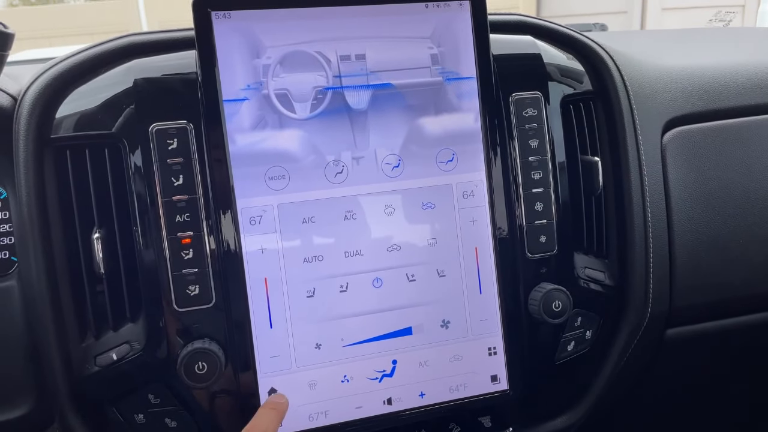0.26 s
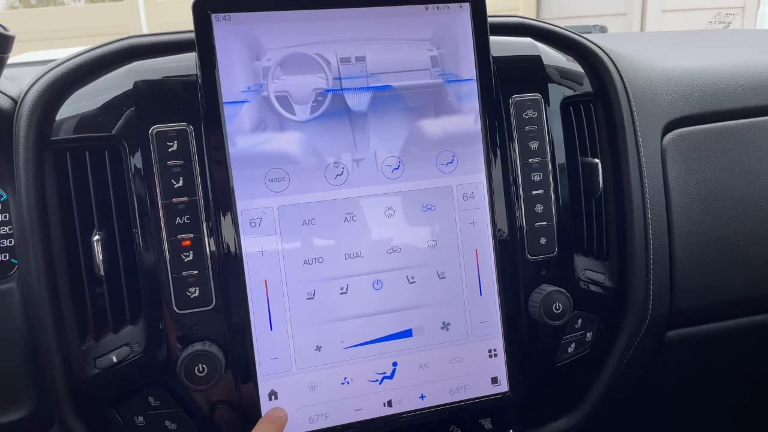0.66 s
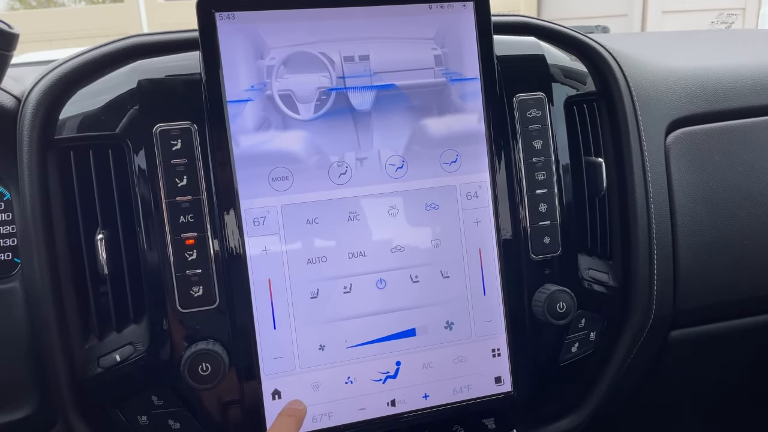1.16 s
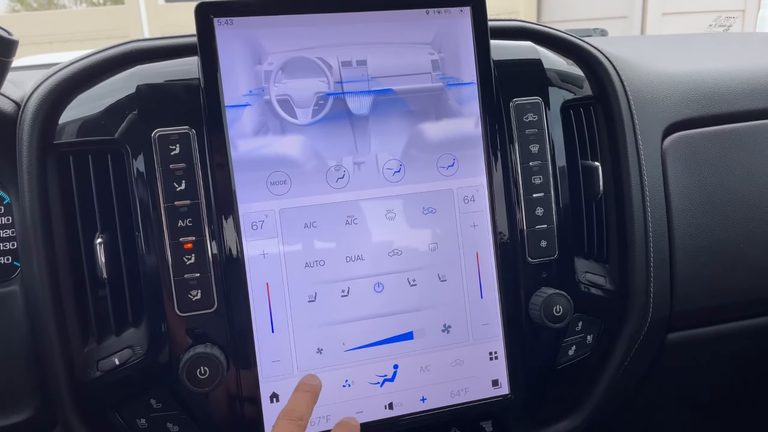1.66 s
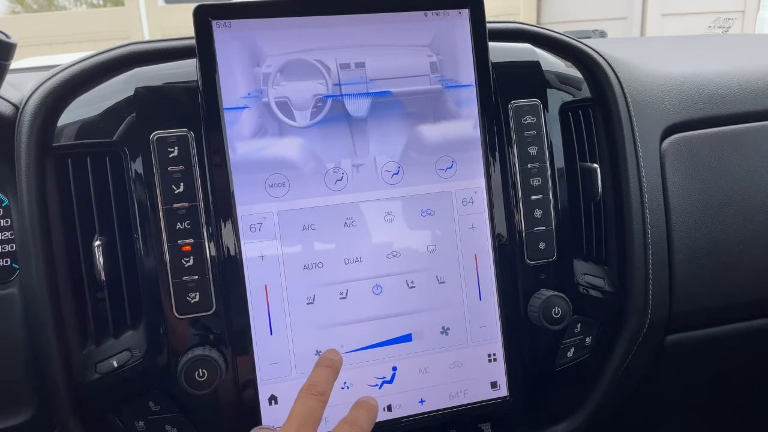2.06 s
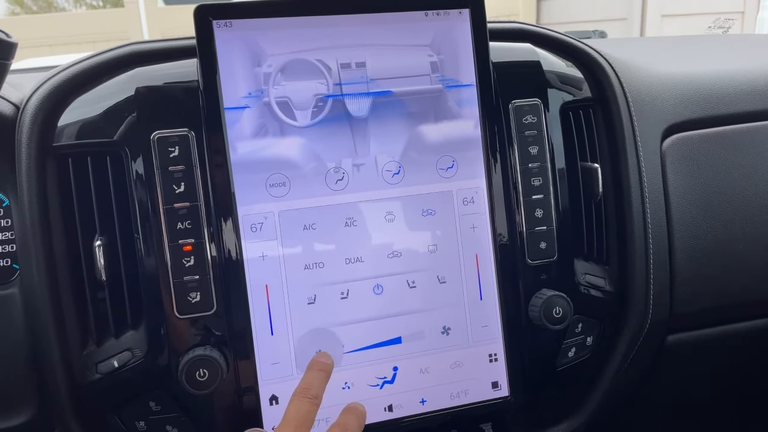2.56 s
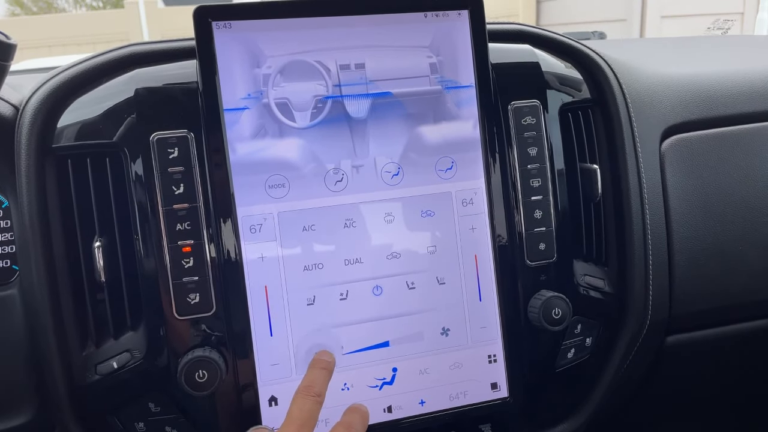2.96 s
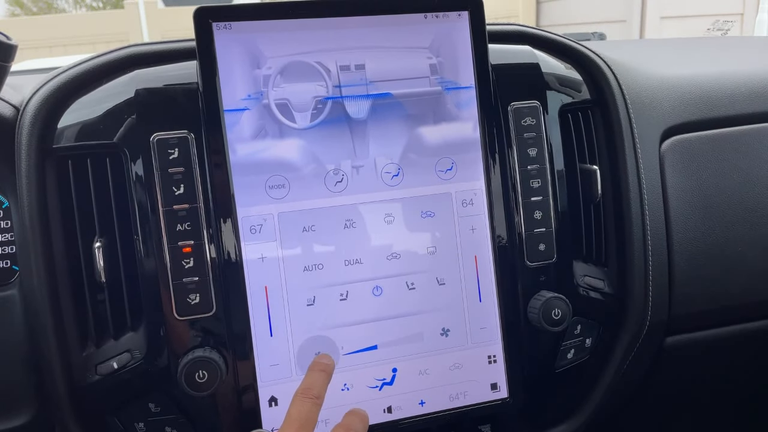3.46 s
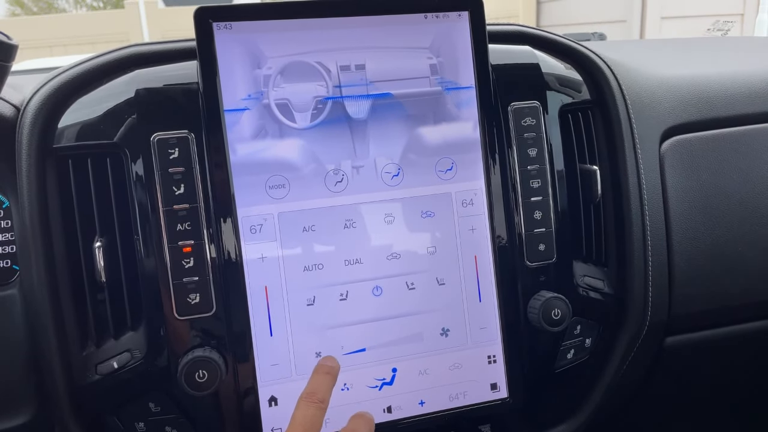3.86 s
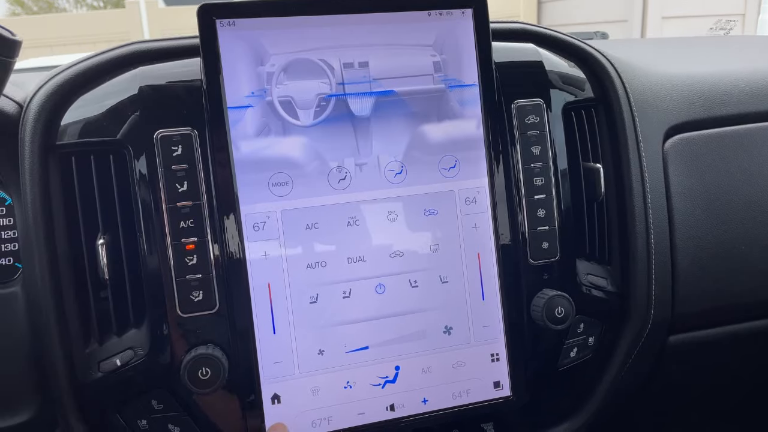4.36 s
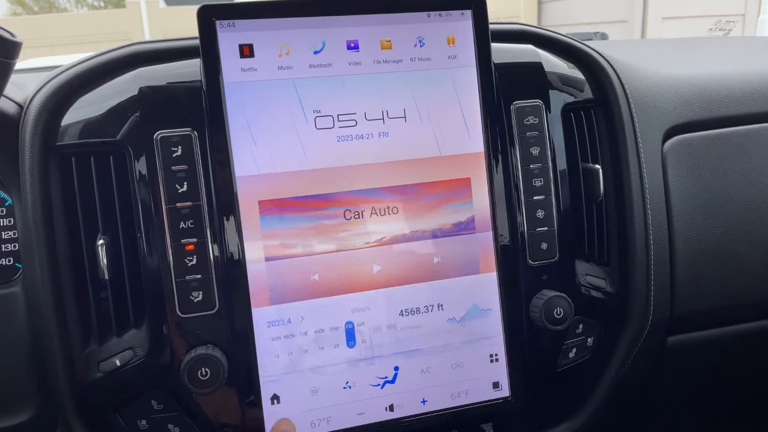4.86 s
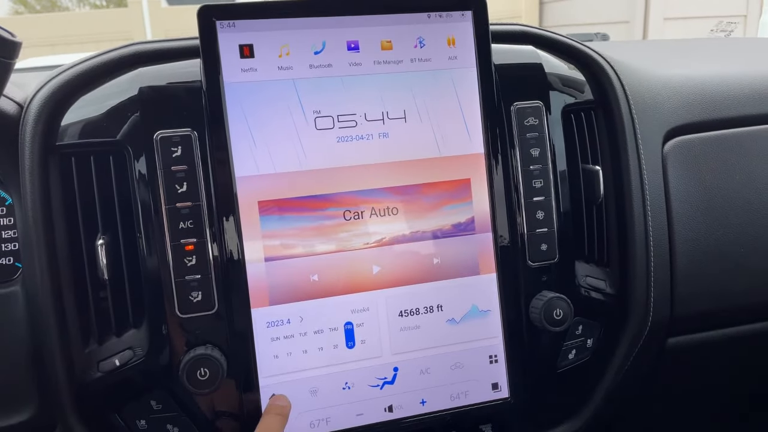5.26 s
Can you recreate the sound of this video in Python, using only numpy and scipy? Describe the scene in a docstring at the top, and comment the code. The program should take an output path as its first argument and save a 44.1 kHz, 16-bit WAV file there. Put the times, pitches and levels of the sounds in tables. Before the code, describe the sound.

Inside a closed pickup cab, heard near the dashboard, an idling engine gives a deep, steady hum beneath a low, slightly uneven rumble. From the start, the climate fan blows air through the vents, a soft rush with a hollow duct tone and a faint whine. The fan gradually speeds up until about 3.3 seconds, the air growing louder and hissier as the whine rises in pitch. Between about 2.4 and 4.3 seconds, a few slight, brief swells flicker in the airy noise. The fan holds its top speed until about 3.8 seconds, then slows, so the rush softens and the whine sinks. At about 5 seconds, a finger on the touch screen makes a quick cluster of soft, bright ticks with a faint brush. The air and engine continue to the end at about 5.5 seconds, fairly quiet throughout.

```python
"""Inside the cab of an idling pickup, the climate blower winds up and then slows again.
Its speed drives the rush of the vents, the hollow ring of the ducts and a faint blade whine;
near full speed the airy noise has a few brief swells. Underneath sit the boom of the cab and the
engine's firing hum. Near the end a few soft ticks sound by the touch screen."""
import sys
import numpy as np
from scipy.fft import rfft, irfft, next_fast_len
from scipy.io import wavfile
from scipy.ndimage import uniform_filter1d, map_coordinates

SR = 44100
rng = np.random.default_rng(int(sys.argv[2]) if len(sys.argv) > 2 else 0)


def wav_out(sig):
    """Save sig, one row per channel (or a flat mono array), as 16-bit PCM at SR to the path in sys.argv[1]."""
    wavfile.write(sys.argv[1], SR, np.round(np.clip(np.atleast_2d(sig).T, -1, 1) * 32767).astype(np.int16))


N = 243167
TIME = np.arange(N) / SR
SIDES = np.array([[.5], [-.5]])  # splits a left-minus-right offset between the channels


def amp(db):
    """Decibels to gain."""
    return 10 ** (np.asarray(db) / 20)

def pan(left_db):
    """Stereo gains with the left side left_db above the right."""
    return amp(left_db * SIDES)

def unit(x):
    """Scale to rms 1."""
    return x / np.sqrt(np.mean(x ** 2) + 1e-30)

def along(points, hz):
    """Read a curve of (f/Hz, value) points on a log frequency axis."""
    f, values = np.transpose(points)
    return np.interp(np.log(hz + 1), np.log(f), values)

def wobble(rate):
    """A smooth random curve, rate knots a second."""
    knots = rng.standard_normal(int(N * rate / SR) + 4)
    return map_coordinates(knots, [np.arange(N) * rate / SR])

def bump(at, half_s):
    """A bell-shaped swell of height 1, centred on time at."""
    return np.exp(-.5 * ((TIME - at) / half_s) ** 2)

def tone(hz, drift, rate):
    """A sine of rms 1 whose phase wanders by about drift radians."""
    return unit(np.sin(2 * np.pi * (hz * TIME + rng.random()) + drift * wobble(rate)))

def filtered(x, response):
    """Pass x through a complex frequency response."""
    size = next_fast_len(N + 8192, real=True)
    return irfft(rfft(x, size) * response(np.fft.rfftfreq(size, 1 / SR)), size)[..., :N]

def resonance(f, hz, width):
    """A band-pass around hz, applied twice for steep skirts."""
    return (1j * f * width / (hz ** 2 - f ** 2 + 1j * f * width)) ** 2

def stereo_noise(spectrum, likeness, balance):
    """Coloured noise of rms 1, its stereo width and balance set by frequency."""
    def mid_side(f):
        angle = np.arccos(np.clip(along(likeness, f), -.999, .999)) / 2
        return amp(along(spectrum, f)) * [np.cos(angle), np.sin(angle)]
    mid, side = filtered(rng.standard_normal((2, N)), mid_side)
    return unit(filtered(np.array([mid + side, mid - side]), lambda f: pan(along(balance, f))))


# The blower's rise and fall: t/s, blade rate f/Hz, whine level/dB
BLOWER_RAMP = [(0, 420.4, -74), (.5, 448, -69), (1, 473.4, -68), (1.5, 496.4, -65), (2, 516, -57.5),
               (2.25, 526.5, -63), (2.65, 541, -58.5), (3.001, 550.4, -64), (3.3, 555, -73),
               (3.8, 555, -59), (4.02, 549.4, -66.5), (4.2, 545.3, -56.5), (4.6, 527.6, -60.5),
               (4.9, 511.6, -61), (5.51, 487, -71.5)]

def blower(ease_s=0.22):
    """Blade rate and whine level over time; the wheel's inertia rounds off each change of speed."""
    times, *columns = np.transpose(BLOWER_RAMP)
    curves = [np.interp(TIME, times, column) for column in columns]
    return [uniform_filter1d(curve, int(ease_s * SR), mode="nearest") for curve in curves]

# Colour of the air's body and of its bright top: f/Hz, relative level/dB
RUSH_EQ = [(60, -9), (120, -3.5), (150, -2.5), (200, 1.5), (270, -2.5), (350, -6), (520, -6.5),
           (610, -12.5), (1000, -15.5), (1850, -23), (2300, -23), (2550, -28), (3700, -33.5), (6000, -68.5),
           (14000, -90)]
HISS_EQ = [(1500, -25), (3000, -6.5), (4200, 0.5), (4800, 2), (5800, -5), (7000, -7), (8800, -10.5),
           (9200, -13), (13000, -19.5), (14300, -32), (14900, -54.5)]
# Stereo image of the air: f/Hz, left-right likeness (clipped to -1..1)
AIR_LIKENESS = [(100, -3.5), (170, 1.2), (260, 0.86), (380, 0.75), (500, 0.57), (620, -0.24), (1000, -0.09),
                (1300, 0), (1850, -0.2), (2400, .5), (3200, 0.2), (4700, .5), (7000, -0.18), (9000, 0.6)]
# Its balance: f/Hz, left over right/dB
AIR_BALANCE = [(100, -0.5), (300, 4.5), (520, 3), (750, 2), (1200, 1), (1700, -0.5), (2500, -2.5),
               (3200, 1.5), (4400, 2.5), (8000, 0)]
# Its phase offset: f/Hz, left lead/rad
AIR_LEAD = [(2300, 0.022), (2800, 0.52), (3800, 0.36), (5000, 0.0014), (9000, 0.032)]

def vents(speed):
    """Air rushes through the louvres; the hiss grows faster with speed than the body does."""
    flutter = amp(0.29 * wobble(7.1))
    rush = amp(-44.5) * speed ** 2.7 * stereo_noise(RUSH_EQ, AIR_LIKENESS, AIR_BALANCE)
    hiss_gain = amp(-72.5 + 0.97 * wobble(13)) * speed ** 6
    hiss = hiss_gain * stereo_noise(HISS_EQ, AIR_LIKENESS, AIR_BALANCE)
    return flutter * filtered(rush + hiss, lambda f: np.exp(1j * SIDES * along(AIR_LEAD, f)))

# Hollow modes of cab, ducts and vents: f/Hz, nominal width/Hz, level at full speed/dB, left lead/rad
DUCT_MODES = [(159, 47, -57.5, 2.5), (180, 19, -57, 0.95), (260.3, 22, -58, -0.5), (642.3, 15, -67.5, -0.5),
              (682.4, 16, -74.5, 0.5), (758, 28, -67, -0.5), (814, 45, -68, 2), (931, 55, -65.5, 0.9),
              (1060, 44, -73.5, 2.5), (1303, 22, -70.5, 1.5), (1405, 290, -62, -2.5), (1540, 75, -68, -1.7),
              (1611, 46, -66, 1.5), (1741, 29, -65.5, 1), (1893, 36, -71.5, 1), (1980, 50, -66, 0.5),
              (2051, 34, -67, -.9), (2115, 42, -64, -1.2), (2332, 99, -70.5, -0.7), (2650, 62, -75.5, 3.5),
              (2767, 29, -77, -0.5), (2927, 51, -77.5, -1.5), (3160, 94, -79, 0.5), (3584, 140, -78.5, 1),
              (3610, 51, -79.5, 1), (3786, 55, -78.5, -1.5), (4330, 61, -91.5, 0.9), (4600, 70, -88.5, 0.5),
              (4740, 50, -89.5, 0.5), (4884, 55, -82, 0.8)]

def ducts(speed):
    """Turbulence rings the duct and cab resonances, which hold their pitch as the speed changes."""
    ring = np.zeros((2, N))
    for hz, width, db, lead in DUCT_MODES:
        stereo_phase = np.exp(1j * lead * SIDES)
        pass_width = 1.3 * width  # the double pass narrows the band again
        band = filtered(rng.standard_normal(N), lambda f: stereo_phase * resonance(f, hz, pass_width))
        drive = speed ** (4.87 * (hz / 2000) ** 0.49)  # faster air feeds the high modes most
        ring += amp(db + wobble(11)) * unit(band) * drive
    flutter = amp(0.4 * wobble(8.1))
    return ring * flutter

def blades(blade_hz, whine_db, rough_share=0.33):
    """The blade whine glides with the wheel; turbulence smears a share of its power."""
    phase = 2 * np.pi * np.cumsum(blade_hz) / SR + 0.5 * wobble(12)
    smear_rate = 44.95  # knots a second
    smeared = unit(wobble(smear_rate) * np.sin(phase) + wobble(smear_rate) * np.cos(phase))
    whine = np.sqrt(1 - rough_share) * unit(np.sin(phase)) + np.sqrt(rough_share) * smeared
    return amp(whine_db + 1.2 * wobble(14)) * whine * pan(4)

# Brief swells in the airy noise: t/s, f/Hz, level/dB
NOISE_SWELLS = [(2.4, 1970, -62), (2.52, 1965, -67), (2.92, 1960, -62), (3.23, 1742, -57),
                (3.36, 1975, -60), (3.82, 1743, -61.5), (3.94, 1743, -64), (4.3, 2110, -64)]

def noise_swells():
    """Brief random swells in the airy noise near 1.7-2.1 kHz, played as short wavering tones."""
    return sum(amp(db) * bump(at, half_s=0.018) * tone(hz, drift=0.78, rate=70)
               for at, hz, db in NOISE_SWELLS)

# Colour of the cab's low end: f/Hz, relative level/dB
BOOM_EQ = [(18, -46), (30, -28.5), (38, -20.5), (48, -16), (56, -0.5), (82, -0.5), (104, -1.5), (128, -5),
           (146, -22), (190, -22.5), (300, -36), (600, -49), (1500, -90.5)]

def cab(speed):
    """The closed cab booms below 140 Hz, swelling with the blower; its top resonance grows most."""
    boom_db = -37.5 + 0.65 * wobble(3) + 0.1 * wobble(8.1)  # slow swell, quick flutter
    boom = stereo_noise(BOOM_EQ, likeness=[(60, 0.98), (130, 0.98), (300, 1.0)],
                        balance=[(40, .4), (90, 0.87), (300, 1.0)])
    upper = unit(filtered(rng.standard_normal(N), lambda f: resonance(f, hz=124.1, width=29.5)))
    upper_db = -43.5 + 0.44 * wobble(5.4)
    return amp(boom_db) * speed ** 0.53 * boom + amp(upper_db) * speed ** 2.8 * upper * pan(0.6)

# Peaks of the low rumble: t/s, f/Hz, level/dB, half length/s
RUMBLE_PEAKS = [(0.635, 73.8, -37, 0.061), (0.925, 82, -39, 0.05), (1.385, 73.9, -35.5, 0.045),
                (1.698, 73.4, -38, .04), (1.98, 119, -38.5, 0.027), (2.252, 121.4, -39, 0.035),
                (2.39, 125, -38.5, .035), (2.57, 127.1, -37.5, 0.035), (2.956, 82.3, -35, 0.038),
                (3.095, 126.1, -36.5, 0.057), (3.335, 82.7, -36.5, 0.076), (3.459, 99.14, -35.5, 0.049),
                (3.716, 83, -37, 0.033), (4.095, 118.4, -36, 0.023), (4.475, 119.4, -35, .05)]

def rumble_peaks():
    """Random peaks of the low rumble at 73-127 Hz, played as short wavering tones."""
    return pan(0.8) * sum(amp(db) * bump(at, half_s) * tone(hz, drift=0.66, rate=30)
                          for at, hz, db, half_s in RUMBLE_PEAKS)

# Thin drones of the idle and the belt-driven parts: f/Hz, level/dB
IDLE_TONES = [(79.6, -53), (84.5, -50.5), (215.5, -58), (297, -62.5), (320, -73.5)]

def engine(firing_hz=39.8):
    """Even firing lays down a deep, steady hum under a few slightly wavering drones."""
    hum = amp(-40.5) * unit(np.sin(2 * np.pi * firing_hz * TIME))
    for hz, db in IDLE_TONES:
        drone = tone(hz, drift=0.47, rate=2.98)
        hum += amp(db + 1.6 * wobble(4)) * drone
    return hum * pan(0.3)

# Ticks by the screen: t/s, level/dB, f/Hz, filter width/Hz, t60/s
SCREEN_TICKS = [(4.9818, -52.5, 6350, 800, .026), (4.9899, -50, 7300, 2400, 0.039),
                (4.9902, -48.5, 3600, 1900, 0.026), (5.0002, -44, 6900, 2300, 0.012),
                (5.0004, -46, 3900, 2300, 0.03), (5.084, -58.5, 6860, 1000, 0.012)]
# Ring of the screen's housing: f/Hz, level against the tick's peak/dB, t60/s
HOUSING_MODES = [(3050, -28, .06), (6250, -33, .04), (6900, -26, .06), (7970, -26, 0.065)]
# Soft, bright brushes: t/s, level/dB, half length/s, f/Hz, filter width/Hz
SCREEN_BRUSHES = [(4.55, -83.5, .02, 9000, 9000), (4.744, -80.5, .018, 12500, 5000),
                  (4.988, -70, 0.019, 8500, 11100), (5.065, -81, 0.025, 7150, 4960)]

def touches():
    """Tiny ticks ring the screen's housing amid short brushes, scattered by the dashboard."""
    def scatter():
        """Noise that is part centred, part different on each side."""
        return unit(rng.standard_normal(N) + rng.standard_normal((2, N)))
    out = np.zeros((2, N))
    for at, db, hz, width, t60 in SCREEN_TICKS:
        age = np.maximum(TIME - at, 0)
        burst = (TIME >= at) * amp(-60 * age / t60) * scatter()
        burst[:, round(at * SR)] += 6  # the sharp first contact
        tick = filtered(burst, lambda f: resonance(f, hz, width))
        ring = sum(amp(mode_db - 60 * age / mode_t60) * np.sin(2 * np.pi * mode_hz * age)
                   for mode_hz, mode_db, mode_t60 in HOUSING_MODES)
        out += amp(db) * (tick / abs(tick).max() + ring)
    for at, db, half_s, hz, width in SCREEN_BRUSHES:
        brush = unit(filtered(scatter(), lambda f: resonance(f, hz, width)))
        out += amp(db) * bump(at, half_s) * brush
    return out * pan(1)

# Colour of the background hiss: f/Hz, relative level/dB
BED_EQ = [(1000, -4.5), (6000, -4.5), (11000, -4.5), (12800, 1), (13600, -9), (14500, -37)]

def hiss_bed():
    """A very faint, steady hiss, almost mono."""
    return amp(-90.5) * stereo_noise(BED_EQ, likeness=[(1000, 0.93)], balance=[(1000, 0.0018)])

# The airflow through vents and ducts wavers gently in level: t/s, level/dB
AIR_WAVER = [(0, 0.35), (.8, 0), (1.2, -0.36), (2, 0.05), (3.15, -0.14), (3.8, 0), (4.3, 0.35), (4.7, 0.3),
             (5, 0), (5.51, 0)]

def scene():
    """One blower speed drives air and cab boom; engine, touches and hiss run on their own."""
    blade_hz, whine_db = blower()
    speed = blade_hz / 555  # 1 at full speed
    bed = hiss_bed()
    waver = amp(np.interp(TIME, *np.transpose(AIR_WAVER)))
    air = waver * (vents(speed) + ducts(speed)) + noise_swells() + blades(blade_hz, whine_db)
    return air + engine() + cab(speed) + rumble_peaks() + touches() + bed

def record(dry):
    """A brick-wall high cut at 15750 Hz."""
    return filtered(dry, lambda f: f < 15750)


dry = scene()
out = record(dry)
wav_out(out)
```